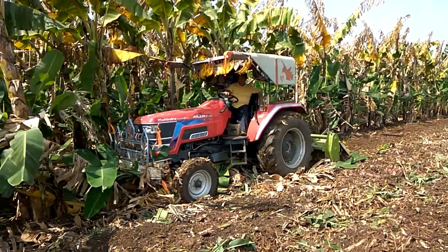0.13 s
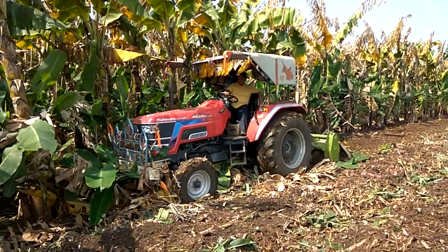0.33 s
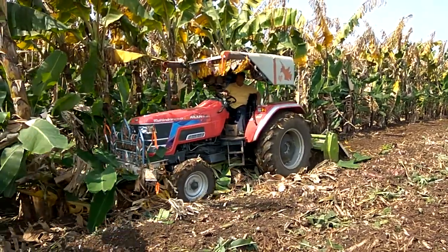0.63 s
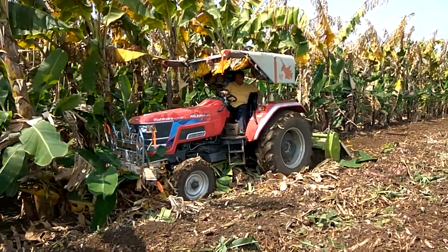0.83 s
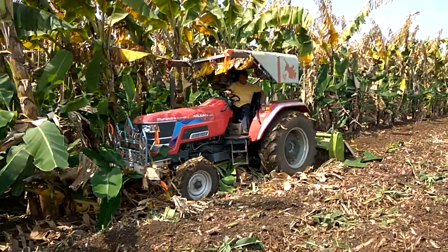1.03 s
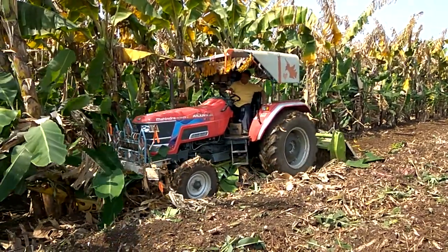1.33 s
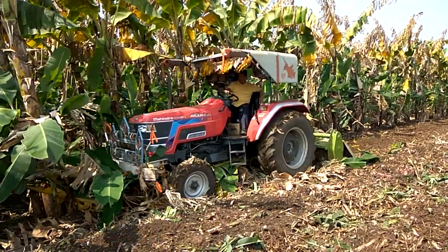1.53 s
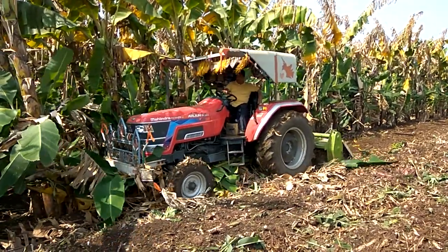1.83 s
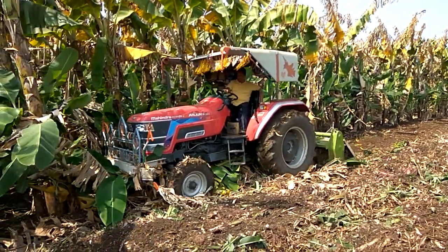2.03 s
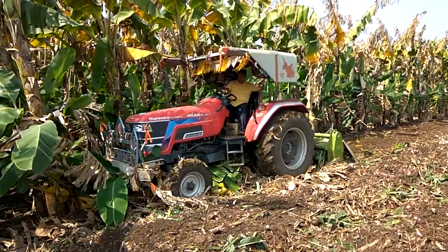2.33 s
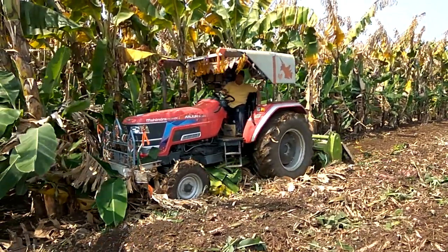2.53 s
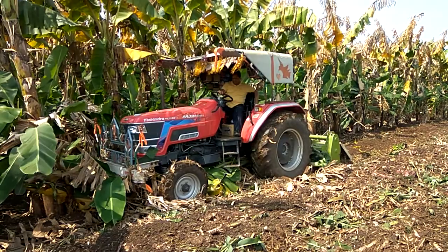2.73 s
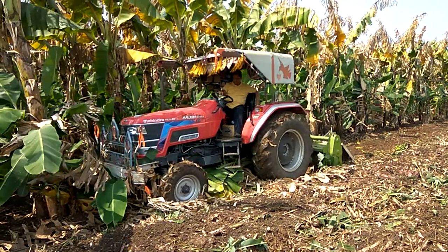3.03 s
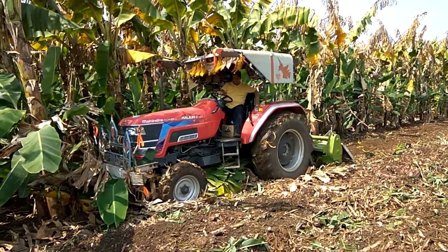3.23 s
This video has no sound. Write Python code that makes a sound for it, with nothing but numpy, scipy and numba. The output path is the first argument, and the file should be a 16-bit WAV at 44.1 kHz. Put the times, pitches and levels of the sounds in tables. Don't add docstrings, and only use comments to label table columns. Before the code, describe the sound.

A diesel tractor runs throughout with uneven, rapid exhaust thumps, low hum and metallic clatter, towing a mulcher some metres away in a leafy field. Flails shred stalks in a dense, gritty rattle with steel knocks and woody cracks, surging around 1.1-2.1 s as the engine briefly quickens. A sharp stalk snap stands out at 2.24 s; afterwards cracks thin, the engine slows and deepens, and scattered knocks continue to 3.4 s.

```python
import sys
import numpy as np
from scipy import signal
from scipy.fft import rfft, irfft
from scipy.io import wavfile
from scipy.ndimage import uniform_filter1d
from numba import njit

SR = 44100
rng = np.random.default_rng(int(sys.argv[2]) if len(sys.argv) > 2 else 0)


def voltage_ratio(level):
    return 10 ** (np.asarray(level, float) / 20)


def persist_wave(psi):
    counts = np.round(np.clip(psi, -1, 1) * 32767).astype(np.int16)
    wavfile.write(sys.argv[1], SR, np.atleast_2d(counts).T)


N = 149499

# start_s, level_db, brightness_db (chips), thud_db (stalks)
LOAD = [(0,-30.5,1.5,3),(.33,-22.5,-8,-24.5),(.4,-24,-3.5,-5),(.55,-22.5,-3.5,-14),(.88,-26.5,-7.5,-5),(.995,-33,0.5,-26),(1.015,-22.5,-4,-4),(1.13,-20.5,-5,-15.5),(1.3,-19,-5.5,-5),(1.415,-28,-2.5,-15),(1.44,-17.5,-6.5,-8),(1.7,-20,-4,-5.5),(2.12,-25.5,-6,-6.5),(2.27,-25,-2,-3.5),(2.42,-28,-4.5,-12.5),(3.145,-34.5,-2.5,-10.5),(3.165,-25.5,-3,-3.5),(3.37,-32,-3.5,-7)]


def level(x):
    return x / np.sqrt(np.mean(x ** 2))


@njit
def svf(x, hz, width):
    y, band, low = np.empty(len(x)), 0., 0.
    g, damping = np.tan(np.pi * hz / SR), width / hz
    for i in range(len(x)):
        v = (band + g * (x[i] - low)) / (1 + g * (g + damping))
        band = 2 * v - band
        low = low + 2 * g * v
        y[i] = damping * v
    return y


def curve(table, column):
    rows = np.array(table, float)
    return np.interp(np.arange(N) / SR, rows[:, 0], rows[:, column])


def walk(rate):
    k = int(SR / rate)
    held = np.repeat(rng.standard_normal(N // k + 1), k)
    smooth = uniform_filter1d(uniform_filter1d(held, k), k)
    return 1.865 * smooth[:N]


def colour(x, points):
    p = np.array(points, float)
    hz = np.maximum(np.arange(N // 2 + 1) * SR / N, 1)
    gain_db = np.interp(np.log(hz), np.log(p[:, 0]), p[:, 1])
    return irfft(rfft(x) * voltage_ratio(gain_db), N)


def body(x, peaks, apart=True):
    total = np.zeros(N)
    for k, (hz, width, db) in enumerate(peaks):
        hz, width = float(hz), 1.16 * width
        struck = np.roll(x, int(hz) * apart)
        ring = level(svf(svf(struck, hz, width), hz, width))
        flicker_db = 1 * walk(55)
        total += (-1) ** k * voltage_ratio(db + flicker_db) * ring
    return level(total)


def field_air():
    # pitch_hz, level_db
    air_spectrum = [(15, -17.5), (25, -5), (216, -4.5), (508, 2.5), (600, -25), (898, -9.5), (1440, -12),
                    (4950, -34), (7240, -32), (9410, -83.5), (15900, -120)]
    return voltage_ratio(-36) * level(colour(rng.standard_normal(N), air_spectrum))


def breeze():
    return np.array([voltage_ratio(-42) * level(svf(rng.standard_normal(N), 130., 300.)) for _ in range(2)])


def strikes():
    strikes_per_s, spread_db = 1800, 2.5
    hit = rng.random(N) < strikes_per_s / SR
    strength = voltage_ratio(spread_db * np.minimum(rng.exponential(size=N), 4))
    return hit * rng.standard_normal(N) * strength


def stalk_thuds(effort_db):
    # pitch_hz, width_hz, level_db
    stalk_modes = [(116, 250, -7.5), (274.8, 183, 0), (426, 118, -5.5), (524.5, 28, -3)]
    return body(strikes(), stalk_modes) * voltage_ratio(effort_db + curve(LOAD, column=3))


def flying_chips(effort_db):
    # pitch_hz, width_hz, level_db
    chip_modes = [(1545, 110, 1), (1810, 270, 4), (2158, 330, 2), (2681, 600, 0), (4053, 500, -3),
                  (4866, 1740, -1), (5820, 420, -6.5), (9000, 580, -13.5)]
    return body(strikes(), chip_modes) * voltage_ratio(effort_db + curve(LOAD, column=2) - 2.5)


def hood_ring(effort_db):
    # pitch_hz, width_hz, level_db
    hood_modes = [(733, 113, -4), (850.6, 40.6, -4), (921.7, 124, -4), (1060, 40, -7.5), (1122, 127, -2),
                  (1363, 160, -6)]
    return body(strikes(), hood_modes, apart=False) * voltage_ratio(effort_db - 2.5)


def hood_knocks():
    # start_s, peak_db, pitch_hz, ring_s
    hits = [(0.081, -20, 932, 0.006), (0.1, -16, 1030, 0.0088), (0.159, -17.5, 1094, 0.0055),
            (0.175, -13, 1114, 0.016), (0.271, -13.5, 940, 0.008), (0.365, -12, 885, 0.012),
            (0.41, -10, 932, 0.0088), (0.474, -17, 954, 0.0061), (0.52, -14.5, 903, 0.012),
            (0.538, -13, 865, 0.0054), (0.587, -13, 947, 0.004), (0.7, -21, 853, 0.011),
            (0.751, -14, 880, 0.0047), (0.831, -21, 1067, 0.0027), (0.848, -8.5, 1110, 0.0041),
            (1.014, -11.5, 850, 0.0043), (1.044, -10.5, 1075, 0.011), (1.113, -6.5, 1110, 0.008),
            (1.185, -22.5, 834, 0.0058), (1.236, -11, 940, 0.009), (1.278, -15.5, 874, 0.0058),
            (1.294, -11.5, 709, 0.01), (1.43, -18.5, 897, 0.011), (1.473, -10, 1113, 0.0057),
            (1.531, -8.5, 1103, 0.0073), (1.61, -15.5, 912, 0.0059), (1.628, -10.5, 914, 0.0072),
            (1.671, -16, 924, 0.008), (1.689, -19, 914, 0.0043), (1.739, -16, 1136, 0.012),
            (1.908, -16, 1140, 0.019), (1.942, -13.5, 912, 0.013), (1.973, -19.5, 884, 0.019),
            (2.07, -15, 1080, 0.0093), (2.139, -17.5, 900, 0.008), (2.169, -6.5, 920, 0.0088),
            (2.239, -12, 907, 0.019), (2.305, -17.5, 904, 0.008), (2.368, -15, 934, 0.009),
            (2.574, -18, 865, 0.017), (2.716, -14.5, 893, 0.012), (2.862, -16, 1153, 0.0094),
            (2.936, -20.5, 944, 0.0056), (2.974, -18, 1010, 0.0087), (3.081, -13.5, 872, 0.008),
            (3.155, -8.5, 930, 0.013), (3.229, -15, 1074, 0.0062), (3.268, -18, 1095, 0.012),
            (.765, -11.5, 925, 0.0049),
        (2.269, -12.5, 880, .008),
        (3.161, -12.5, 944, .006),
        (3.173, -14.5, 1023, 0.0045),
        (3.194, -17.5, 1151, .01),
        (3.381, -11.5, 954, .012),
    ]
    rise_s, ring_share, width_hz = .0006, 1.2, 500.
    out, t = np.zeros(N + SR), np.arange(SR // 8) / SR
    for start_s, peak_db, hz, ring_s in hits:
        noise = rng.standard_normal(len(t)) * np.minimum(t / rise_s, 1)
        tone = ring_share * np.sin(2 * np.pi * hz * t)
        knock = svf((noise + tone) * np.exp(-t / max(ring_s, .003)), float(hz), width_hz)
        i = int(start_s * SR)
        out[i:i + len(t)] += knock / np.abs(knock).max() * voltage_ratio(peak_db - 3)
    return out[:N]


def chops():
    # start_s, peak_db, pitch_hz
    cuts = [(0.0754, -28.5, 2160), (0.169, -10, 2100), (0.2414, -27, 1620), (0.2848, -17.5, 2560),
            (0.3945, -11.5, 1550), (0.4254, -14, 1890), (0.4609, -18.5, 1830), (0.4903, -9, 2820),
            (0.5232, -10.5, 2670), (0.599, -20, 2160), (0.6518, -19, 2770), (0.6801, -27, 2110),
            (0.7177, -27, 2220), (0.7592, -11.5, 1980), (0.8458, -21.5, 2200), (0.9158, -19, 2240),
            (0.9812, -17, 2160), (1.0126, -14.5, 2320), (1.0385, -23.5, 1500), (1.0625, -15.5, 1720),
            (1.0799, -20.5, 2400), (1.1203, -16, 1680), (1.2037, -20.5, 1850), (1.2291, -15, 2030),
            (1.255, -14, 1480), (1.3049, -13, 2200), (1.3279, -16, 2290), (1.4132, -24, 1450),
            (1.428, -14, 2550), (1.5473, -9, 2020), (1.6184, -7.5, 2130), (1.6549, -10, 1550),
            (1.6749, -8, 2190), (1.7499, -13, 2270), (1.8088, -12.5, 2220), (1.8487, -14, 2075),
            (1.94, -27, 1530), (2.0009, -18, 1830), (2.1695, -20, 1890), (2.2413, -1.5, 2030),
            (2.3077, -15, 2210), (2.6424, -20, 2010), (2.8978, -39.5, 1830), (3.1562, -23, 1930),
            (3.202, -37.5, 2170),
            (2.255, -19.5, 4000),
        (2.267, -14.5, 3190),
        (2.278, -17.5, 4500),
        (2.29, -18, 2270),
        (3.163, -19, 2310),
        (3.19, -21, 2110),
        (.545, -14.5, 2750),
        (.57, -18, 2750),
    ]
    crack_s = .007
    out, t = np.zeros(N + SR), np.arange(SR // 8) / SR
    for start_s, peak_db, hz in cuts:
        noise = rng.standard_normal(len(t)) * np.exp(-t / crack_s)
        crack = svf(noise, float(hz), 630.) + voltage_ratio(-16.5) * svf(noise, 4500., 1700.)
        i = int(start_s * SR)
        out[i:i + len(t)] += crack / np.abs(crack).max() * voltage_ratio(peak_db - 4)
    snap_s, snap_db, snap_len_s = 2.2415, -11, .0025
    i = int(snap_s * SR)
    burst = t / snap_len_s * np.exp(1 - t / snap_len_s)
    out[i:i + len(t)] += voltage_ratio(snap_db) * burst * svf(rng.standard_normal(len(t)), 4600., 9700.)
    return out[:N]


def exhaust(pulses):
    # start_s, level_db
    nearness = [(0, 1.5), (.6, -6), (1.4, -3.5), (2.2, -4.5), (2.5, -15), (3.39, -10.5)]
    # pitch_hz, width_hz, level_db
    silencer = [(185.6, 38, -2), (234.7, 140, -8.5)]
    puff_hz, rise_s, fall_s, echo_s = 246, .0024, .0028, .0088
    t = np.arange(-SR // 40, SR // 40 + 1) / SR
    swell = np.exp(-(t / np.where(t < 0, rise_s, fall_s)) ** 2)
    dip = -swell * np.cos(2 * np.pi * puff_hz * t)
    puff = dip - swell * dip.sum() / swell.sum()
    direct = level(signal.oaconvolve(pulses, puff, "same"))
    near = voltage_ratio(curve(nearness, column=1))
    ring = sum(voltage_ratio(db) * svf(direct, float(hz), float(width)) * 2 for hz, width, db in silencer)
    direct = direct + near * ring
    return 0.6 * (direct + near * np.roll(direct, int(echo_s * SR)))


def engine():
    # start_s, firing_rate_hz
    speed = [(0.0, 59.93), (0.18, 62.54), (0.36, 64.4), (0.5, 62.93), (0.72, 60.94), (0.9, 60.85),
             (1.05, 62.12), (1.25, 65.55), (1.42, 67.18), (1.6, 65.18), (1.8, 63.5), (2.1, 60.93),
             (2.3, 59.99), (2.5, 57.99), (2.7, 55.39), (2.9, 54.5), (3.1, 54.85), (3.39, 52.61)]
    # start_s, hum_db, thump_db
    effort = [(0, -31.5, -32.5), (.2, -40, -24.5), (.3, -38, -29), (.56, -33, -18.5), (.9, -36.5, -26),
              (1.05, -32.5, -17), (1.38, -36, -30), (1.5, -27, -26), (1.75, -33, -24), (2.13, -37, -23.5),
              (2.27, -33, -20.5), (2.8, -42, -23), (3.15, -39, -24), (3.39, -39.5, -27)]
    cylinders_db = [2, -1.5, -6, -12.5]
    # start_s, share of the pattern
    uneven = [(0, 1.24), (1.3, 0.96), (1.5, .7), (2.4, 0.98), (2.9, 0.61), (3.39, .75)]
    # multiple of the firing rate, level_db
    hum_orders = [(1, -0.5), (2, 3)]
    # pitch_hz, level_db
    clatter_spectrum = [(240, -38), (400, 1), (594, -10.5), (882, -3), (982, 1), (1120, -16), (1230, -8.5),
                        (3030, -25.5), (7000, -29), (9100, -67.5), (15400, -120)]
    strong_firing_s, scatter_db, jitter_s = 2.5404, 1, .0001

    firings = np.cumsum(curve(speed, column=1)) / SR
    firings = firings - firings[int(strong_firing_s * SR)]
    k = np.arange(np.ceil(firings[0]), firings[-1]).astype(int)
    jitter = jitter_s * SR * rng.standard_normal(len(k))
    at = np.clip(np.interp(k, firings, np.arange(N)) + jitter, 0, N - 1).astype(int)
    pattern_db = np.array(cylinders_db)[k % 4] * curve(uneven, column=1)[at]
    pulses = np.zeros(N)
    pulses[at] = voltage_ratio(pattern_db + scatter_db * rng.standard_normal(len(k)))
    thump = exhaust(pulses) * voltage_ratio(curve(effort, column=2) - 1.5)

    hum = np.zeros(N)
    for order, db in hum_orders:
        tone = np.sqrt(2) * np.sin(2 * np.pi * order * (firings + .2))
        hum += voltage_ratio(db + 0.3 * walk(24)) * tone
    hum *= voltage_ratio(curve(effort, column=1))

    gate = 0.51 + np.exp(-(firings % 1) / 0.74)
    rattle = gate * voltage_ratio(2.1 * walk(30)) * rng.standard_normal(N)
    clatter = voltage_ratio(-29.5) * level(colour(rattle, clatter_spectrum))
    return thump + hum + clatter


def foliage(x, count):
    leaves_s, low_hz, flutter_per_s = .009, 1300, 30
    t = np.arange(SR // 10) / SR
    tails = rng.standard_normal((count, 2, len(t))) * np.exp(-t / leaves_s)
    tails /= np.sqrt(count * leaves_s * SR / 2)
    high = signal.sosfilt(signal.butter(2, low_hz, "high", fs=SR, output="sos"), x)
    out = np.zeros((2, N))
    for pair in tails:
        fluttering = high * walk(flutter_per_s)
        out += signal.oaconvolve(fluttering[None], pair, axes=1)[:, :N]
    return out


def ports(x):
    # pitch_hz, lag_radians
    left_lag = [(0, 0), (300, .27), (950, .65), (1850, 3.3), (2070, 6.6), (2400, 8.1), (2850, 7.5),
                (3620, 13.4), (9000, 35.7)]
    # pitch_hz, level_db
    left_db = [(340, .2), (520, 5), (690, -6), (900, 0), (1150, 3), (1750, -3.5), (3000, 4), (5700, -3.5)]
    hz = np.arange(N // 2 + 1) * SR / N
    tilt = voltage_ratio(np.interp(hz, *np.array(left_db).T) / 2)
    late = tilt * np.exp(-1j * np.interp(hz, *np.array(left_lag).T))
    direct = irfft(rfft(x) * np.array([late, 1 / tilt]), N)
    return direct + voltage_ratio(-3) * foliage(x, count=6)


def scene():
    effort_db = curve(LOAD, column=1) + .7 * walk(70)
    mulcher = hood_ring(effort_db) + stalk_thuds(effort_db) + flying_chips(effort_db)
    blows = hood_knocks() + chops()
    wide_chips = np.array([flying_chips(effort_db) for _ in range(2)])
    return ports(field_air() + mulcher + blows + engine()) + breeze() + voltage_ratio(-2.5) * wide_chips


def band_limit(x):
    return signal.sosfilt(signal.butter(12, 10200, fs=SR, output="sos"), x)


def record(dry):
    headroom, top_hz, dip_hz, sheen_hz, sheen_width_hz = 1.1, 5510, 7930., 9050., 900.
    dry = headroom * np.tanh(dry / headroom)
    rolled = signal.sosfilt(signal.butter(4, top_hz, fs=SR, output="sos"), dry)
    mix = []
    for soft, full in zip(rolled, dry):
        dipped = soft - svf(soft, dip_hz, 3300.)
        sheen = svf(svf(full, sheen_hz, sheen_width_hz), sheen_hz, sheen_width_hz)
        mix.append(dipped + voltage_ratio(-31) * sheen)
    return band_limit(np.array(mix))


dry = scene()
out = record(dry)
persist_wave(out)
```